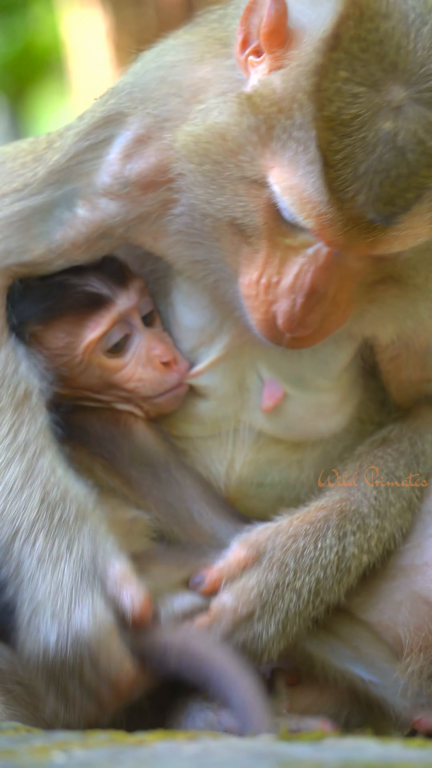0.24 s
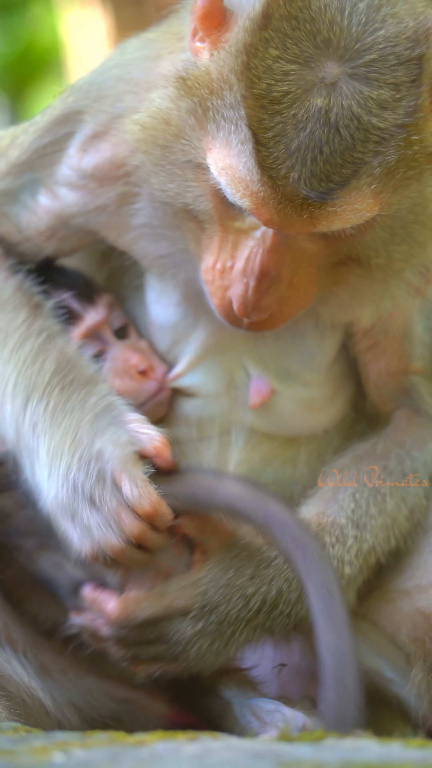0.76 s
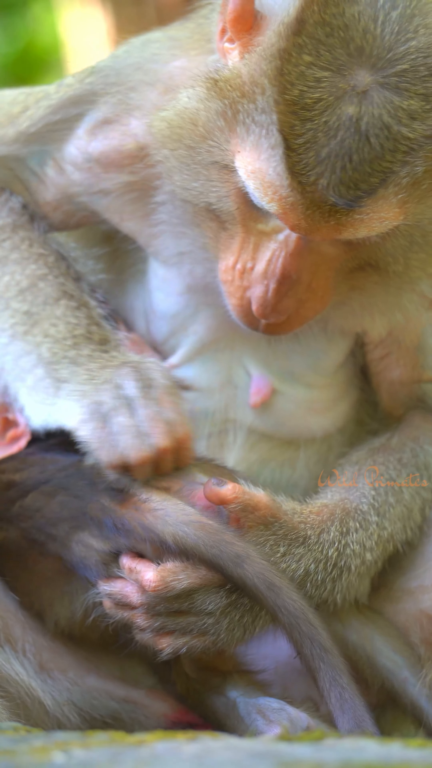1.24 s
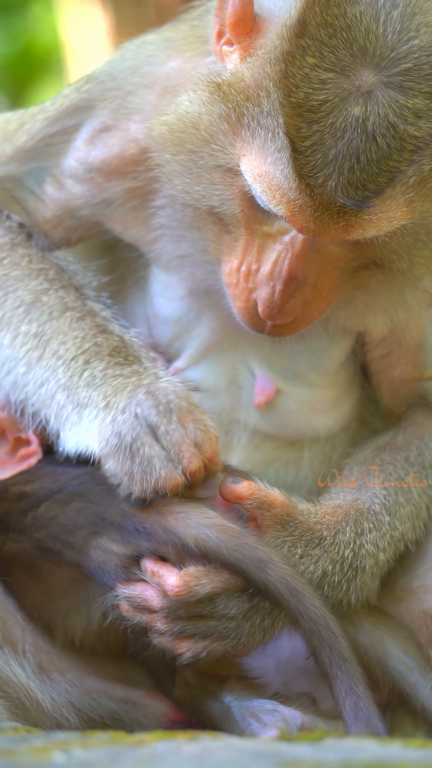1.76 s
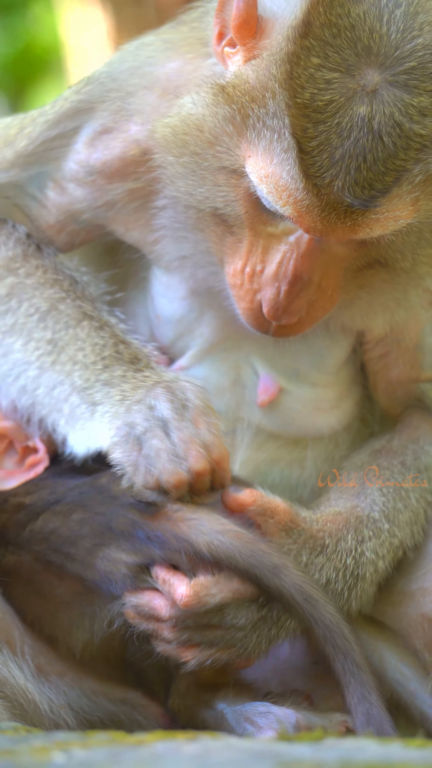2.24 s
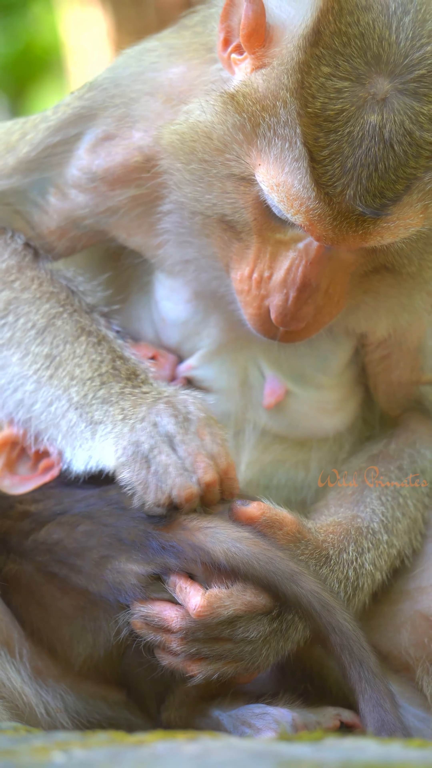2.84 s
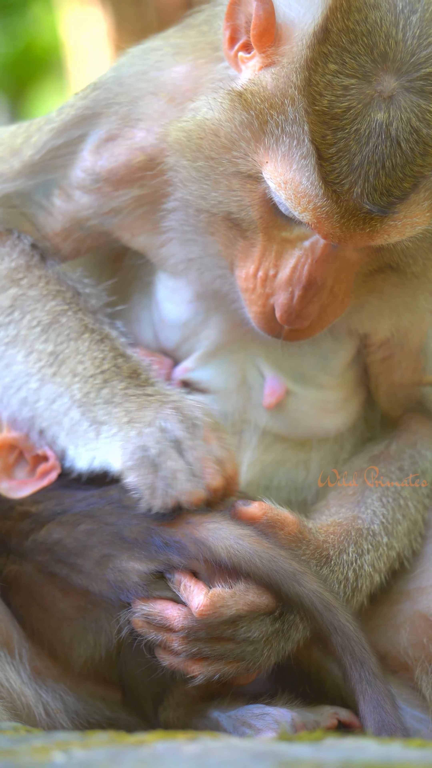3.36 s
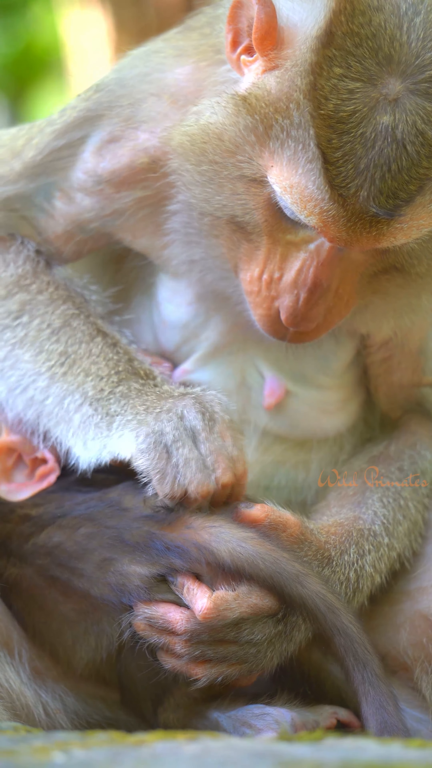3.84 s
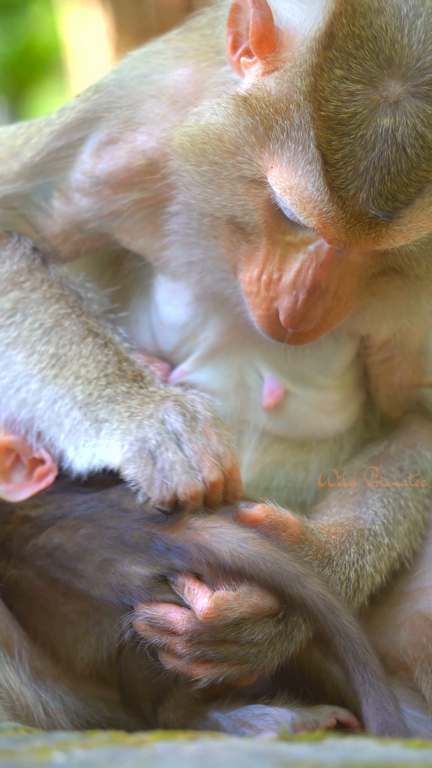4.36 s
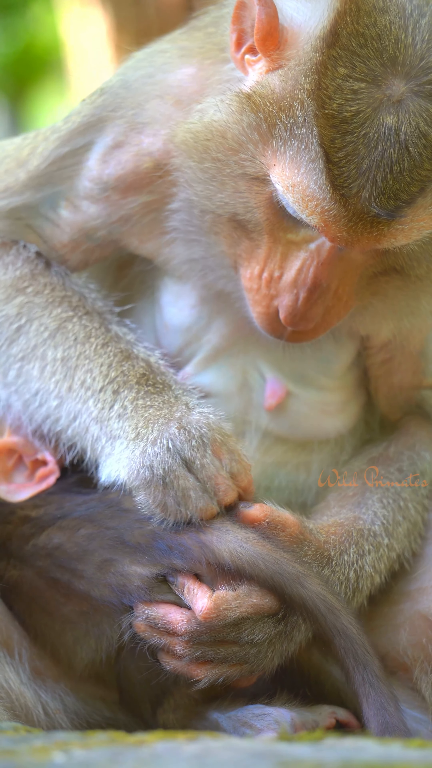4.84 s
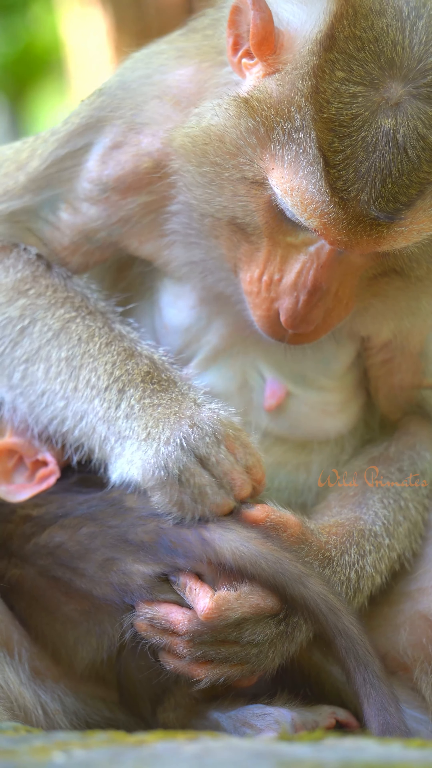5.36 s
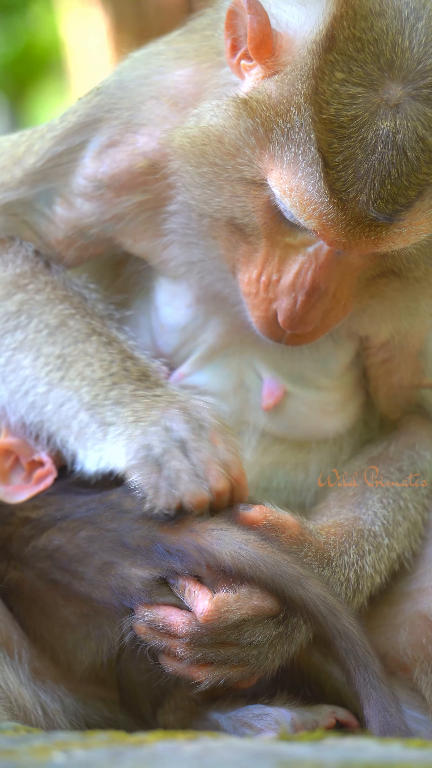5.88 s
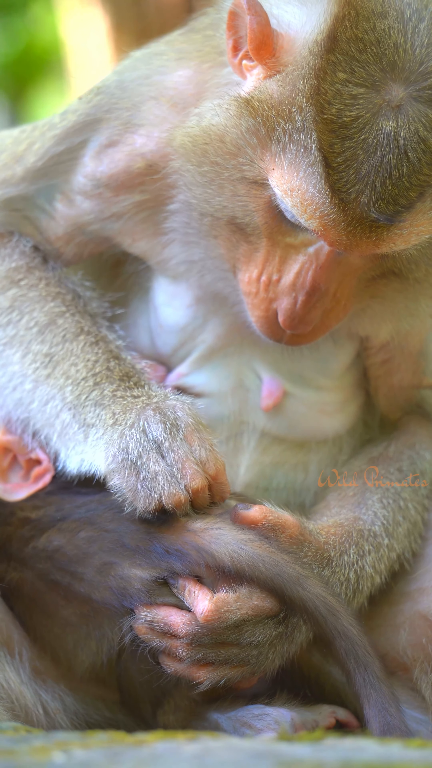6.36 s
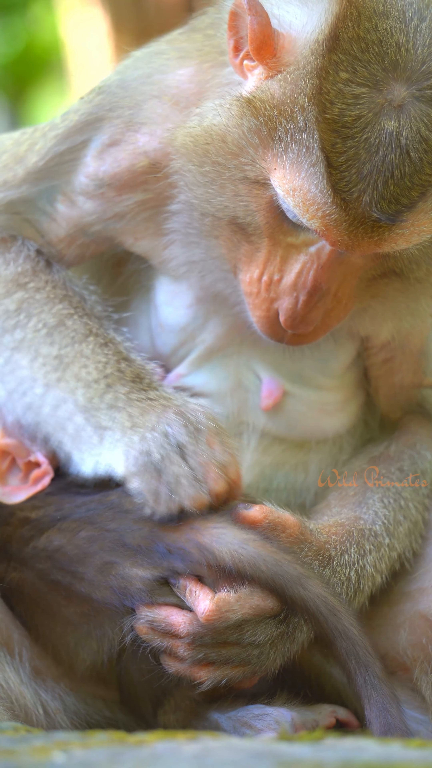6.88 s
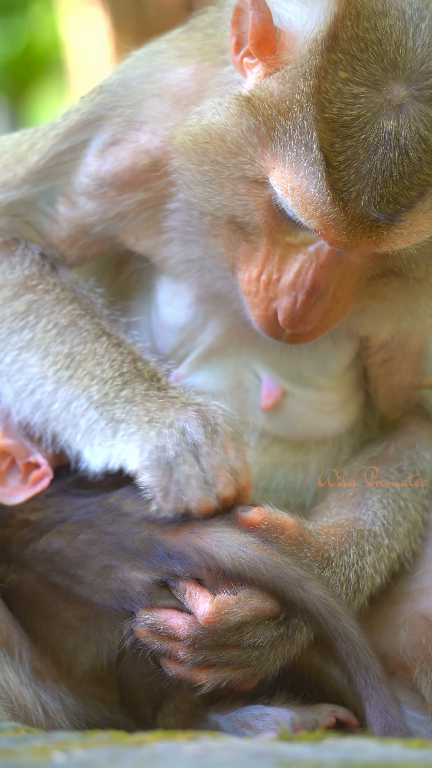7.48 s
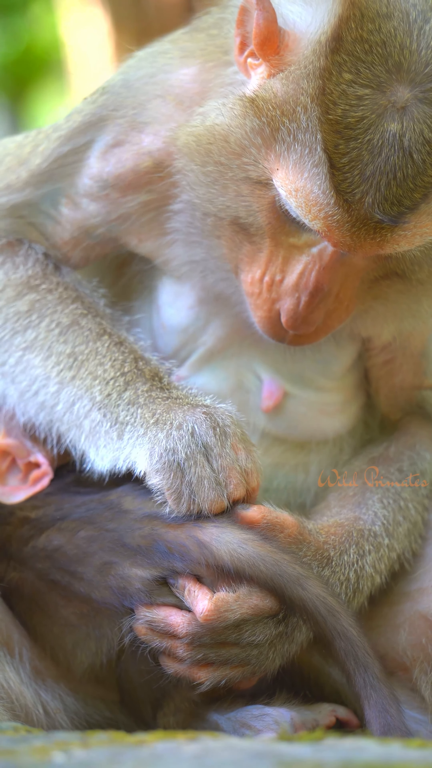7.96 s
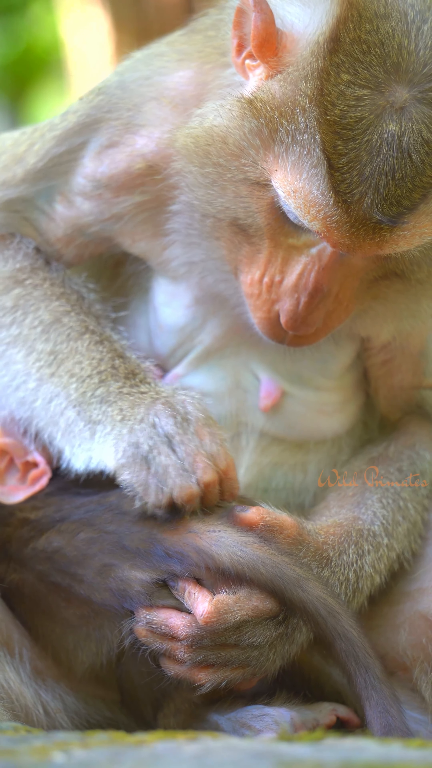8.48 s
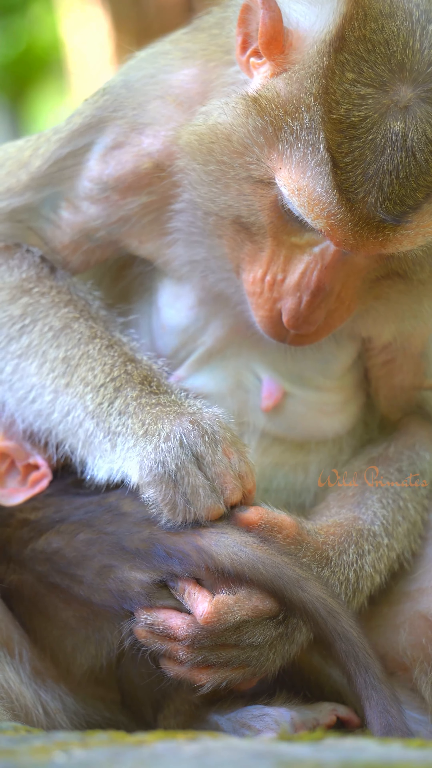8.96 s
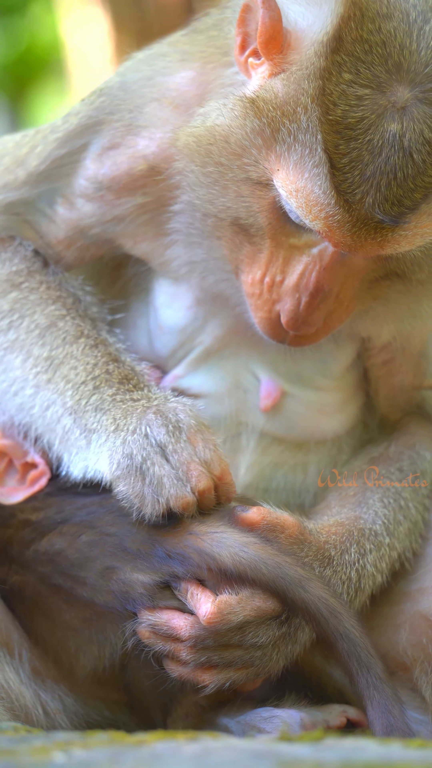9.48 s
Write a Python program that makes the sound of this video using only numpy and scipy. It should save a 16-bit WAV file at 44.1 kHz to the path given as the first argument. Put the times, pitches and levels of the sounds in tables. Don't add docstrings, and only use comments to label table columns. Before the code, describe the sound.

Busy leaf-litter shuffling gives way to sparse, loud woody clicks in a quiet forest with high insect hiss, tiny chirps and distant whistles.

```python
import sys
import numpy as np
from scipy import signal
from scipy.fft import rfft, irfft
from scipy.io import wavfile

SR = 44100
rng = np.random.default_rng(int(sys.argv[2]) if len(sys.argv) > 2 else 0)


def to_linear_factor(level_db):
    exponent = np.asarray(level_db, float) / 20
    return 10 ** exponent


def persist_wave(psi):
    counts = np.round(np.clip(psi, -1, 1) * 32767).astype(np.int16)
    wavfile.write(sys.argv[1], SR, np.atleast_2d(counts).T)


N = 428652


def rms_one(x):
    return x / np.sqrt(np.mean(x ** 2) + 1e-20)


def pan(left_re_right_db):
    return to_linear_factor(np.array([[.5], [-.5]]) * left_re_right_db)


def at_hz(points, hz):
    table_hz, value = np.array(points).T
    return np.interp(np.log(hz + 1), np.log(table_hz), value)


def colour(x, spectrum):
    hz = np.fft.rfftfreq(N, 1 / SR)
    return irfft(rfft(x) * to_linear_factor(at_hz(spectrum, hz)), N)


def drift(rate_hz):
    hop = 40
    pole = np.exp(-2 * hop * np.pi * rate_hz / SR)
    noise = rng.standard_normal(N // hop + 2002)
    slow = signal.lfilter([1], [1, -2 * pole, pole * pole], noise)[2000:]
    return np.interp(np.arange(N) / hop, np.arange(len(slow)), rms_one(slow))


def add(track, at_s, sound):
    i = int(round(at_s * SR))
    track[..., i:i + sound.shape[-1]] += sound[..., :N - i]


def trunks(x, t60_s, wet_db):
    t = np.arange(SR) / SR
    echoes = rng.standard_normal((2, SR)) * to_linear_factor(-60 * t / t60_s) * (t > .012)
    echoes = echoes / np.sqrt(np.sum(echoes ** 2, axis=1, keepdims=True))
    stereo = x + np.zeros((2, 1))
    return x + to_linear_factor(wet_db) * signal.fftconvolve(stereo, echoes, axes=1)[:, :N]


def air():
    # freq_hz, correlation
    likeness = [(60, 1), (150, 0.84), (380, 0.19), (950, 0.018), (2380, 0.25), (5980, 0.068), (15000, 0.31)]
    # freq_hz, density_db
    air_spectrum = [(15, -30), (25, -16), (35, -5), (54, 0), (66, -5.5), (95, -6), (130, -12.5),
                    (170, -18.5), (300, -22), (500, -23.5), (1000, -27.5), (2500, -31.5), (5000, -37.5),
                    (8000, -37.5)]
    mid, side = rfft(rng.standard_normal((2, N)))
    hz = np.fft.rfftfreq(N, 1 / SR)
    alike = np.clip(at_hz(likeness, hz), 0, .988)
    both = np.sqrt(1 + alike) * mid + np.sqrt(1 - alike) * side * [[1], [-1]]
    noise = rms_one(irfft(both * to_linear_factor(at_hz(air_spectrum, hz)), N))
    return to_linear_factor(-46) * pan(-0.11) * noise * to_linear_factor(.5 * drift(0.78))


def drone(pitch_hz, level_db):
    phase = 2 * np.pi * np.cumsum(pitch_hz * (1 + 0.02615 * drift(2.46))) / SR
    return to_linear_factor(level_db + 0.74 * drift(8.2)) * np.sin(phase)


def chorus(level_db=-45, shared=.2):
    # freq_hz, density_db
    insect_spectrum = [(6500, -41), (7900, -29), (8400, -13.5), (10000, -10.5), (11500, -5.5), (13100, 0.5),
                       (14300, -6.5), (15800, -12.5), (16500, -50)]
    left, right = rng.standard_normal((2, N))
    both = np.array([left, shared * left + right])
    flicker = to_linear_factor(.25 * drift(.8) + .4 * drift(14))
    return to_linear_factor(level_db) * flicker * pan(5.7) * rms_one(colour(both, insect_spectrum))


def rustle(grains_per_s=1800, spread_db=3.6, hiss=1.5, rise_db_per_s=409, fall_db_per_s=274):
    # freq_hz, density_db
    litter_spectrum = [(150, -10), (250, -2.5), (404, -1.5), (440, -1), (1130, 2), (1670, 1.5), (3940, 1),
                       (12900, -3), (15000, -36)]
    # start_s, hold_s, level_db, brightness_db
    shuffles = [(0, 0.021, -40, -4), (0.097, 0.006, -42.5, 4), (0.144, .15, -51.5, -1.5),
                (0.343, 0.21, -57.5, -1), (0.615, .2, -59, -2), (0.966, 0.072, -47, 1.5),
                (1.069, 0.13, -53.5, -1.5), (1.31, 0.056, -47, 0), (1.393, .025, -43, 1.5),
                (1.46, .11, -44.5, 1.5), (1.645, 0.031, -51, 2), (1.715, 0.035, -44, 0),
                (1.808, 0.0085, -47, -2), (1.877, 0.058, -50, 5), (1.999, 0.0094, -47, 1),
                (2.059, 0.11, -50.5, 0.5), (2.193, 0.053, -47.5, 1.5), (2.305, 0.071, -63, 5),
                (7.3, 0.24, -63.5, -7.5)]
    t = np.arange(N) / SR
    dull, bright = np.zeros(N), np.zeros(N)
    for start_s, hold_s, level_db, bright_db in shuffles:
        rise_db = rise_db_per_s * np.maximum(start_s - t, 0)
        fall_db = fall_db_per_s * np.maximum(t - start_s - hold_s, 0)
        gain = to_linear_factor(level_db - rise_db - fall_db)
        dull += gain * to_linear_factor(-bright_db)
        bright += gain * to_linear_factor(bright_db)
    sizes = to_linear_factor(spread_db * np.minimum(rng.exponential(1, N), 3.2)) * rng.choice([-1, 1], N)
    clumping = to_linear_factor(np.clip(3.0 * drift(90), -8, 5))
    born = rng.random(N) < grains_per_s * clumping / SR
    near = rms_one(sizes * born) + hiss * rng.standard_normal(N)
    both = rms_one(colour(near + 0.43 * rng.standard_normal((2, N)), litter_spectrum))
    low = signal.lfilter(*signal.butter(1, 3000, fs=SR), both)
    unsteady = to_linear_factor(2.3 * drift(53) + 1.4 * drift(20))
    return unsteady * pan(9.5) * (low * dull + (both - low) * bright)


def snaps(ring_cycles=4.84, scatter_db=-17, bounce_s=.004):
    # at_s, peak_db, ring_hz
    crackles = [(0.0174, -16, 1450), (0.0966, -20, 2900), (0.1046, -22, 1680), (0.1383, -26, 1310),
                (0.204, -28.5, 3030), (0.25, -28, 4870), (0.2672, -29.5, 1800), (0.3303, -39, 5000),
                (0.4838, -31, 1770), (0.618, -35.5, 1390), (1.1125, -36, 1120), (1.1553, -32, 4170),
                (1.1822, -23.5, 4380), (1.317, -23.5, 4140), (1.3557, -20, 4700), (1.389, -20, 3500),
                (1.404, -20, 4830), (1.417, -21.5, 4100), (1.53, -24, 5530), (1.577, -32, 3000),
                (1.6011, -25, 1250), (1.8026, -19, 3800), (1.864, -32, 4370), (1.8896, -27, 2520),
                (1.924, -18, 3000), (2.001, -23, 2000), (2.0538, -31, 3490), (2.1514, -26, 2480),
                (2.2347, -22.5, 1650), (2.2766, -27, 4160)]
    # at_s, peak_db, ring_hz, crack_re_peak_db
    twigs = [(2.3804, -35, 6550, -13), (2.778, -35.5, 3800, -17), (2.896, -20.5, 1850, -1.5),
             (2.929, -5.5, 4270, -12), (3.3317, -32.5, 5330, -24), (3.9921, -21, 2040, -19),
             (4.3961, -6.5, 1860, -23), (4.7494, -27.5, 6500, -23), (5.4114, -6, 2750, -23),
             (6.4138, -16, 4930, -17), (7.3555, -35, 1600, -10), (8.0694, -35, 1090, -10),
             (8.1783, -39, 2310, -13), (8.3858, -36.5, 2170, -7), (8.5404, -34.5, 5300, -14),
             (8.8686, -33, 2600, -13), (9.409, -29, 1900, -3)]
    out, t = np.zeros((2, N)), np.arange(int(.12 * SR)) / SR
    breaks = [(at_s, peak_db, hz, crack_db, 4.5, 0) for at_s, peak_db, hz, crack_db in twigs]
    for at_s, peak_db, hz in crackles:
        crack_db = -6.5 - 5 * np.log2(hz / 2000)
        breaks.append((at_s, peak_db, hz, crack_db, 8, 4))
    noise = rng.standard_normal((len(breaks), 2, len(t)))
    bright = signal.butter(2, [2500, 10000], "band", fs=SR, output="sos")
    for (at_s, peak_db, hz, crack_db, pan_db, crush_db), grit in zip(breaks, noise):
        swing = (1 - np.exp(-1.6 * t * hz)) * to_linear_factor(7 - 60 * t * hz / ring_cycles)
        ring = -np.sin(2 * np.pi * hz * t) * swing
        ring = ring + 0.27 * np.sin(np.pi * hz * t) * swing
        ring = ring + 0.27 * np.roll(ring, int(bounce_s * SR))
        crack = to_linear_factor(crack_db + 12.5 - 60 * t / 0.0016) * signal.sosfilt(bright, grit[0])
        band_hz = [hz / 1.8, min(hz * 1.8, 15000)]
        splinter_band = signal.butter(2, band_hz, "band", fs=SR, output="sos")
        scatter = signal.sosfilt(splinter_band, grit[0] + .5 * grit)
        t60_s = 0.015 - .0009 * peak_db
        tail = to_linear_factor(scatter_db + crush_db - 60 * t / max(t60_s, .005)) * rms_one(scatter)
        thin = signal.butter(2, hz / 12.3, "high", fs=SR, output="sos")
        snap = signal.sosfilt(thin, ring + crack + tail)
        add(out, at_s + .0005, to_linear_factor(peak_db) * pan(pan_db) * snap)
    return out


def whistles(rise=.015):
    # lag_s, length_s, pitch_hz, level_re_song_db
    song = [
        (0, .07, 1550, -4),
        (0.067, 0.068, 1625, 2.5),
        (0.176, 0.058, 1720, 3),
        (.29, 0.063, 1870, 4),
        (0.378, .1, 2450, 0),
        (.45, .22, 2640, -0.5),
        (0.619, .36, 2705, -4),
    ]
    # start_s, time_stretch, level_db
    songs = [
        (4.24, 0.96, -59),
        (8.925, .8, -60.5),
    ]
    # start_s, length_s, pitch_hz, level_db
    other_notes = [(.33, .055, 1860, -50.5), (3.45, .06, 3100, -61), (3.527, 0.092, 2720, -61),
                   (3.63, 0.1, 1294, -65), (3.846, 0.09, 1305, -61), (4.02, 0.07, 1310, -61),
                   (4.1, 0.27, 3020, -66), (4.997, 0.038, 1856, -50), (5.099, 0.078, 1750, -58),
                   (5.22, .06, 1830, -62), (5.44, 0.056, 2700, -65), (5.47, .12, 900, -63),
                   (8.698, .04, 1300, -62), (9.128, 0.031, 1700, -55), (9.27, .06, 1670, -60),
                   (9.45, .05, 877, -55), (9.6, .1, 1494, -62), (9.645, .03, 1850, -60)]
    sung = []
    for start_s, stretch, level_db in songs:
        for lag_s, length_s, hz, step_db in song:
            sung.append((start_s + lag_s * stretch, length_s * stretch, hz, level_db + step_db))
    out, waver, wobble = np.zeros(N), to_linear_factor(2.5 * drift(20)), .014 * drift(40)
    for start_s, length_s, hz, level_db in sung + list(other_notes):
        size, i = int(length_s * SR), int(start_s * SR)
        pitch_hz = hz * (1 + rise * np.linspace(-1, 1, size) + np.resize(wobble[i:], size))
        tone = np.sin(2 * np.pi * np.cumsum(pitch_hz) / SR)
        add(out, start_s, to_linear_factor(level_db) * signal.windows.tukey(size, .6) * tone)
    return out * waver


def chips(burr_hz=260, burr=0.033):
    # time_s, pitch_ratio, level_db
    chip_shape = [(0, 1.0, -16), (.012, 1.0, -1), (.022, .985, -3), (.034, .94, -5), (.05, .885, -12)]
    # at_s, peak_db, left_re_right_db, start_hz
    calls = [
        (0.3747, -43.5, 4, 6590),
        (2.0875, -44, 6, 6620),
        (3.5557, -46, 4, 6580),
        (4.7206, -43, 5, 6660),
        (6.305, -43, 4.5, 6620),
        (7.718, -43, 6, 6630),
        (9.6764, -46, 4, 6630),
    ]
    out, (shape_s, ratio, shape_db) = np.zeros((2, N)), np.transpose(chip_shape)
    t = np.arange(int(shape_s[-1] * SR)) / SR
    burring = burr * (t / shape_s[-1]) ** 2 * np.sin(2 * np.pi * burr_hz * t)
    slur = np.interp(t, shape_s, ratio) + burring
    for at_s, peak_db, pan_db, hz in calls:
        phase = 2 * np.pi * np.cumsum(hz * slur) / SR
        swell = to_linear_factor(peak_db + np.interp(t, shape_s, shape_db))
        add(out, at_s - .008, swell * np.sin(phase) * pan(pan_db))
    return out


def rolls(count=10, fall_db_per_pulse=2.5, octave_db=-21):
    # start_s, pulse_gap_s, pitch_hz, loudest_db, pulse_s
    calls = [
        (.96, .0395, 900, -42, .031),
        (4.948, .0375, 905, -42, .034),
        (8.888, .036, 900, -43, .04),
    ]
    out = np.zeros(N)
    chance = rng.standard_normal((len(calls), count, 2))
    for (start_s, gap_s, hz, level_db, pulse_s), rows in zip(calls, chance):
        t = np.arange(int(pulse_s * SR)) / SR
        for k, (detune, uneven) in enumerate(rows):
            climb = -0.03 * np.exp(-k / 0.74)
            pitch_hz = hz * (1 + climb + 0.012 * detune + 0.08 * (t / pulse_s - .5))
            phase = 2 * np.pi * np.cumsum(pitch_hz) / SR
            tone = np.sin(phase) + to_linear_factor(octave_db + 4 * detune) * np.sin(2 * phase)
            pulse_db = level_db - fall_db_per_pulse * abs(k - 1.2) + 0.59 * uneven
            add(out, start_s + k * gap_s, to_linear_factor(pulse_db) * np.hanning(len(t)) * tone)
    return out


def stir():
    # middle_s, length_s, level_db
    gusts = [
        (2.4, 1.1, -59.5),
        (3.7, .8, -59),
        (4.798, 1.1, -59.5),
        (5.102, 0.35, -65.5),
        (7.445, 0.42, -58),
        (7.89, 1.03, -57),
        (9.293, 0.89, -56),
    ]
    t = np.arange(N) / SR
    swell = np.zeros(N)
    for middle_s, length_s, level_db in gusts:
        swell += to_linear_factor(level_db) * np.cos(np.pi * np.clip((t - middle_s) / length_s, -.5, .5)) ** 2
    band = signal.butter(1, [700, 3500], "band", fs=SR, output="sos")
    leaves = signal.sosfilt(band, rng.standard_normal((2, N)))
    return swell * to_linear_factor(3.5 * drift(24)) * rms_one(leaves)


def scene():
    bed = air() + drone(pitch_hz=53.64, level_db=-45) + chorus() + stir()
    near = rustle() + trunks(snaps(), t60_s=0.4, wet_db=-20.0)
    whistler = trunks(whistles() * pan(1.5), t60_s=1.5, wet_db=-4)
    near_branches = trunks(chips(), t60_s=.15, wet_db=-1)
    chipper = trunks(near_branches, t60_s=1.1, wet_db=-2)
    roller = trunks(rolls() * pan(2.5), t60_s=1.4, wet_db=-3)
    return bed + near + whistler + chipper + roller


def roll_off(x):
    return signal.sosfilt(signal.butter(12, 16810, fs=SR, output="sos"), x)


def record(dry):
    top = signal.cheby2(16, 45, 15950, fs=SR, output="sos")
    return roll_off(signal.sosfilt(top, dry))


dry = scene()
out = record(dry)
persist_wave(out)
```